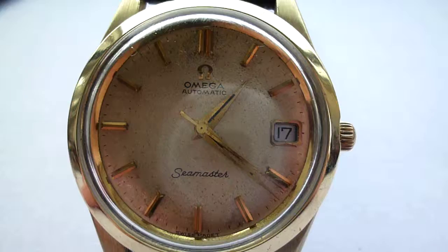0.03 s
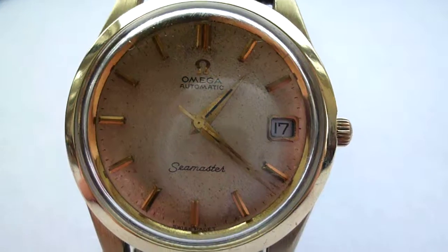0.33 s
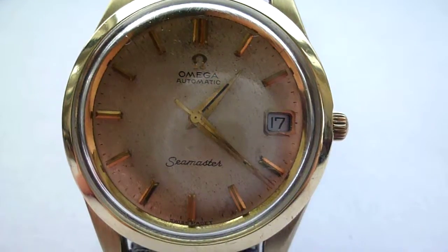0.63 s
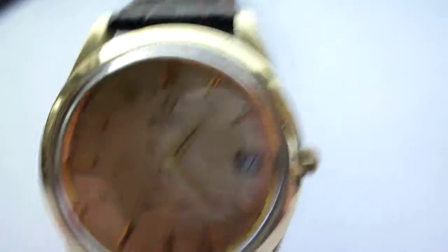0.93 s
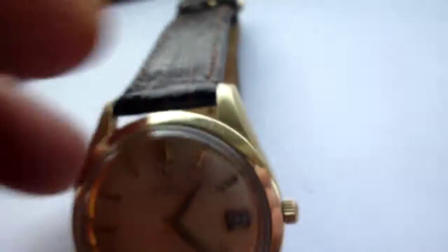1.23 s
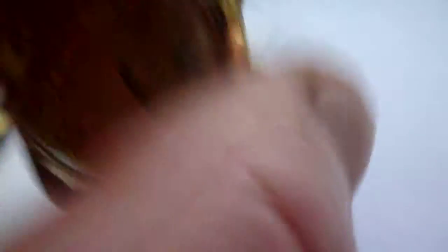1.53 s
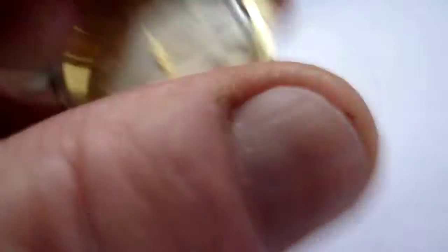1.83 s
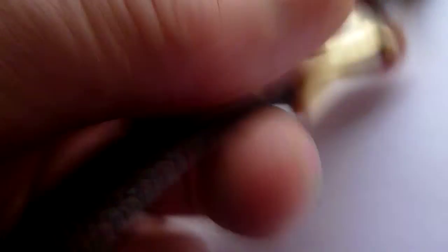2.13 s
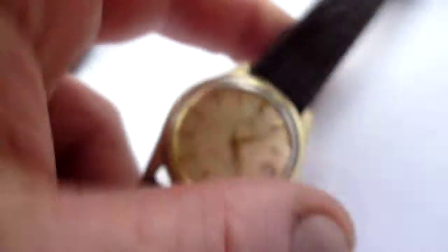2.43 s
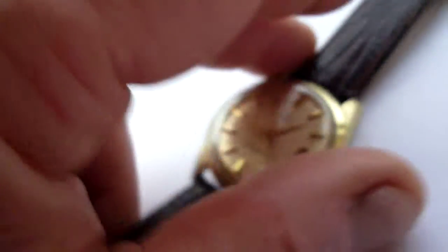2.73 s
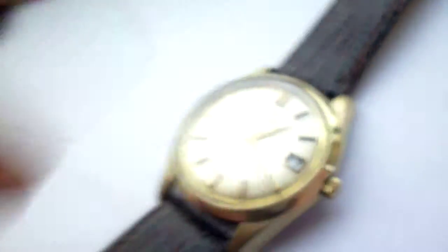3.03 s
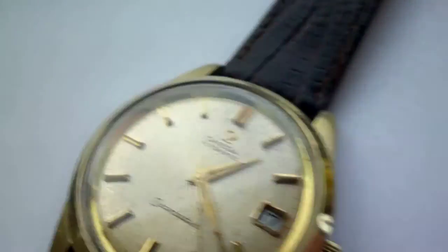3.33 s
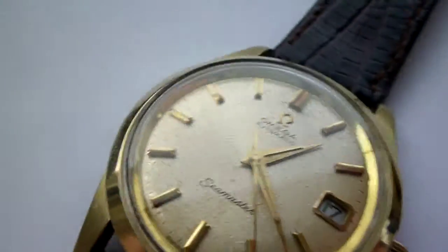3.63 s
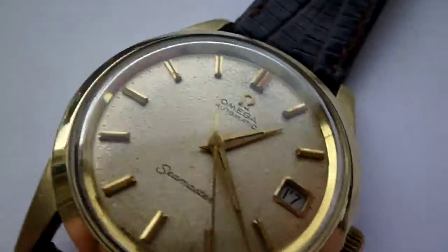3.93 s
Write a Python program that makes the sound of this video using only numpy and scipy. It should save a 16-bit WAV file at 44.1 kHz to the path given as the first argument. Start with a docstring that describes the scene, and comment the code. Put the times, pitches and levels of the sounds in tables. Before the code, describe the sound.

A wristwatch is handled close to the microphone in a quiet, faintly hissing room. After a few soft microphone bumps come leather rubs and sharp little metal clicks, then a light knock on a table with brief buckle chatter.

```python
"""A wristwatch is laid on a table: its case knocks on the top, which rings, and its buckle chatters.
Before that it is picked up and turned: the leather strap scuffs and creaks as it sticks and slips,
and the metal clicks in the fingers. Now and then fingers bump a hand-held camera close by.
A quiet room and the microphone's hiss lie under it all."""
import sys
import numpy as np
from scipy import signal
from scipy.fft import rfft, irfft
from scipy.io import wavfile
from scipy.ndimage import uniform_filter1d

SR = 44100
rng = np.random.default_rng(int(sys.argv[2]) if len(sys.argv) > 2 else 0)


def dump(signal):
    """Clip the signal to [-1, 1] and save it as 16-bit WAV at the path in sys.argv[1]."""
    limited = np.clip(np.atleast_2d(signal).T, -1, 1)
    pcm = np.round(limited * 32767).astype(np.int16)
    wavfile.write(sys.argv[1], SR, pcm)


N = 176400
TIME = np.arange(N) / SR


def gain(db):
    """Turn decibels into a number to multiply by."""
    return 10 ** (np.asarray(db) / 20)


def normalize(x):
    """Scale a sound to an average strength (rms) of 1."""
    return x / np.sqrt(np.mean(x ** 2))


def noise(colour, tilt_db=0):
    """Noise of strength 1, shaped by (frequency [Hz], level [dB]) points and tilted by dB per octave."""
    hz, db = np.array(colour).T
    octave = np.log2(np.fft.rfftfreq(N, 1 / SR) + 1)
    shape_db = np.interp(octave, np.log2(hz), db)
    shape_db += tilt_db * np.clip(octave, np.log2(hz[0]), np.log2(hz[-1]))
    return normalize(irfft(rfft(rng.standard_normal(N)) * gain(shape_db), N))


def fade(fade_s):
    """Die away by 60 dB in the given fade time."""
    return np.exp(-np.log(1000) * np.minimum(TIME / fade_s, 10))


def ring(tones):
    """A struck object rings with several tones, each fading at its own rate."""
    return sum(gain(db) * fade(fade_s) * np.sin(2 * np.pi * hz * TIME) for hz, db, fade_s in tones)


def arch(length_s):
    """A smooth rise and fall."""
    return np.sin(np.pi * np.minimum(np.arange(int(length_s * SR) + 2) / (length_s * SR), 1))


def add(out, start_s, sound):
    """Mix a sound in at a given time."""
    i = max(int(start_s * SR), 0)
    out[i:i + len(sound)] += sound[:N - i]


# the room's murmur and the microphone's hiss (frequency [Hz], relative level [dB])
BACKGROUND_COLOUR = [(15, -33.5), (25, -13), (30, -15.5), (33, -16), (129, -6), (190, -3.5), (219, -5),
                     (266, -5.5), (300, -5.5), (392, -8), (605, -12), (733, -13), (980, -15.5),
                     (1050, -15.5), (3280, -24.5), (6760, -29.5), (8000, -30.5), (10400, -57),
                     (17600, -120)]
# faint steady tones (pitch [Hz], level [dB])
STEADY_TONES = [(194, -70), (4387, -86.5), (6665, -87)]
def background(level_db=-53, waver_db=0.27):
    """Air murmurs and the microphone hisses, barely wavering, with faint steady tones."""
    drift = uniform_filter1d(rng.standard_normal(N), size=3000)
    waver = normalize(uniform_filter1d(drift, size=3000))
    tones = sum(gain(db) * np.sqrt(2) * np.sin(2 * np.pi * (hz * TIME + rng.random()))
                for hz, db in STEADY_TONES)
    return noise(BACKGROUND_COLOUR) * gain(level_db + waver_db * waver) + tones


# sound coming back from the walls (frequency [Hz], relative level [dB])
ECHO_COLOUR = [(100, -0.5), (400, -2.5), (1200, -7.5), (3000, -12.5), (8000, -6)]
def with_room_echo(sound, echo_db=-13.5, fade_s=0.23, delay_s=0.0056):
    """The walls add a short, dull tail to a sound."""
    tail = noise(ECHO_COLOUR) * fade(fade_s) * (TIME > delay_s)
    tail /= np.sqrt(np.sum(tail ** 2))
    return sound + gain(echo_db) * signal.fftconvolve(sound, tail)[:N]


# fingers bump the camera (time [s], level [dB], pitch [Hz], length [cycles])
FINGER_BUMPS = [(0.121, -40.5, 125, 1.5), (0.3226, -31.5, 150, 1.05), (0.3375, -34.5, 172, 1.5),
                (0.4896, -39.5, 238, 2.7), (1.0433, -37, 216, 3.6), (1.101, -44, 190, 3.5),
                (1.149, -46.5, 362, 6.4), (3.058, -47.5, 278, 5.66), (3.712, -47.5, 447, 7.73)]
def camera_bumps():
    """Each soft push rocks the camera back and forth once or a few times."""
    out = np.zeros(N)
    for start, db, hz, cycles in FINGER_BUMPS:
        swell = arch(cycles / hz) ** 2
        rocking = np.cos(2 * np.pi * (hz * TIME[:len(swell)] - cycles / 2))
        add(out, start, gain(db) * swell * rocking)
    return out


# how loudly the strap slides (time [s], level [dB])
SLIDE_LEVELS = [(.95, -75), (1.13, -71), (1.37, -66.5), (1.65, -69.5), (1.95, -70.5), (2.3, -74)]
# the hiss of sliding leather (frequency [Hz], relative level [dB])
LEATHER_COLOUR = [(500, -19), (2400, 2), (2800, 6), (3150, -9), (6800, -6.5), (8500, -11)]
def strap_slide():
    """The strap slides faintly through the fingers while the watch is turned."""
    times, db = np.array(SLIDE_LEVELS).T
    sliding = (TIME > times[0]) & (TIME < times[-1])
    return noise(LEATHER_COLOUR) * gain(np.interp(TIME, times, db)) * sliding


# strap rubs on skin (time [s], length [s], level [dB], pitch [Hz], filter width [share of pitch])
STRAP_RUBS = [(0.321, 0.0033, -48, 1300, 0.42), (0.3234, 0.0036, -39.5, 476, 0.58),
              (0.3385, 0.0028, -41.5, 616, 1.0), (0.35, .03, -62, 1490, .5),
              (0.417, 0.019, -59.5, 1530, 0.33), (0.4926, 0.0076, -49, 895, 0.11),
              (.493, 0.017, -54.5, 1570, 0.17), (1.07, 0.027, -65, 2680, 0.09),
              (1.104, .012, -57.5, 2190, 1.3), (1.32, 0.1, -67.5, 2870, .1), (1.147, .028, -49.5, 640, 1.2),
              (1.146, 0.013, -57.5, 2870, 1.1), (1.938, .07, -65.5, 3550, .15),
              (2.0698, 0.0047, -47.5, 2950, 0.34), (2.075, 0.015, -49, 2320, 0.42),
              (2.07, .02, -52, 950, 0.44), (2.078, 0.0067, -56.5, 4820, 0.24),
              (2.113, 0.01, -56, 2130, 0.38)]
def strap_scuffs(slips_per_s=3300, spread_db=4.5):
    """Leather sticks and slips in tiny, uneven jerks; each short run of them rings around one pitch."""
    out = np.zeros(N)
    slips = (rng.random(N) < slips_per_s / SR) * rng.choice([-1, 1], N)
    friction = slips * gain(spread_db * rng.standard_normal(N))
    for start, length, db, hz, width in STRAP_RUBS:
        swell = arch(length)
        band = signal.iirpeak(hz, 1 / width, fs=SR)
        rub = signal.lfilter(*band, signal.lfilter(*band, friction))[int(start * SR):]
        scuff = normalize(swell * rub[:len(swell)]) * np.sqrt(np.mean(swell ** 2))
        add(out, start, gain(db) * scuff)
    return out


# the metal clicks in the fingers (time [s], level [dB], brightness [dB per octave])
METAL_CLICKS = [(1.6978, -28.5, 2.5), (1.7008, -45, 4), (2.0701, -34, -4), (2.0742, -42, -8),
                (2.1114, -39, -3)]
# the crack that starts a click (frequency [Hz], relative level [dB])
CRACK_COLOUR = [(200, -8), (750, 19), (1450, 6), (2200, -7.5), (3100, 6.5), (4200, -4.5), (5200, -1),
                (6600, -1), (8500, -8.5)]
# tones of the watch case while held (pitch [Hz], relative level [dB], fade time [s])
CASE_TONES = [(730, -9.5, 0.014), (946, -19, .025), (1430, -19.5, 0.03), (2830, -28, 0.005),
              (3200, -38, .012), (6800, -23, .008)]
def metal_clicks():
    """The metal gives sharp cracks, and the fingers quickly stop its ringing."""
    out, case = np.zeros(N), ring(CASE_TONES)
    for start, db, bright_db in METAL_CLICKS:
        crack = noise(CRACK_COLOUR + [(11000, -34)], bright_db) * fade(fade_s=0.009)
        add(out, start, gain(db) * (crack / 2 + case))
    return out


# the buckle bounces (time [s], level [dB])
BUCKLE_BOUNCES = [(2.4687, -52), (2.4745, -42), (2.4814, -48), (2.4855, -44.5), (2.4896, -45.5),
                  (2.4950, -51), (2.499, -48), (2.5105, -55)]
# tones of the buckle (pitch [Hz], relative level [dB], fade time [s])
BUCKLE_TONES = [(5650, -16, 0.0079), (6250, -15, 0.012), (6830, -11, 0.037), (6880, -8, 0.055),
                (7050, -13.5, .015)]
def buckle_chatter(tick_db=-4, pitch_spread=0.0035):
    """The loose buckle bounces: each time a tick and a thin ring at a slightly different pitch."""
    out = np.zeros(N)
    tick_colour = [(1000, -18), (3000, -1), (6000, 8), (7200, -8), (8200, -15), (11000, -40)]
    for start, db in BUCKLE_BOUNCES:
        pitch_factor = 1 + pitch_spread * rng.standard_normal()
        metal = ring(np.array(BUCKLE_TONES) * [pitch_factor, 1, 1])
        tick = noise(tick_colour) * fade(fade_s=0.011)
        add(out, start, gain(db) * (metal + gain(tick_db) * tick))
    return out


# the watch case hits the table (time [s], level [dB], contact time [ms])
CASE_HITS = [(2.4708, -30, 0.21), (2.4750, -52.5, 0.22), (2.4802, -39.5, 0.24), (2.4889, -46, 0.47),
             (2.5490, -51.5, 1), (2.5595, -44.5, 0.58)]
# tones of the table top (pitch [Hz], relative level [dB], fade time [s])
TABLE_TONES = [(130, -31, .15), (197.6, -9, 0.2), (278, -13, .22), (325, -8.5, .22), (444, -16, 0.19),
               (502, 8, 0.046), (560, -5, 0.14), (712, 7.5, 0.041), (770, -12, 0.089), (947, -11, 0.092),
               (1074, -17, 0.12), (1405, -7, 0.053), (1550, -19, 0.027)]
# the table's thud, a short blur of many tones (frequency [Hz], relative level [dB])
THUD_COLOUR = [(25, -14), (100, 0.5), (200, 9), (550, -2), (1400, 1), (2200, -20), (8000, -27)]
def table_knocks(thud_db=7.5, low_hz=171, high_hz=1620):
    """Each hit of the case pushes the table top and makes it ring; a longer push sounds duller."""
    out, table_ring = np.zeros(N), ring(TABLE_TONES)
    for start, db, contact_ms in CASE_HITS:
        push = arch(contact_ms / 1000)
        thud = gain(thud_db) * noise(THUD_COLOUR) * fade(fade_s=0.027)
        knock = signal.fftconvolve(table_ring + thud, push / (2 * push.sum()))
        add(out, start, gain(db) * knock)
    # the board gives off little bass or treble
    out = signal.sosfilt(signal.butter(2, low_hz, "highpass", fs=SR, output="sos"), out)
    return signal.sosfilt(signal.butter(6, high_hz, fs=SR, output="sos"), out)


def scene():
    """The watch sounds with the room's echo; the camera bumps and the background have none."""
    watch = table_knocks() + buckle_chatter() + metal_clicks() + strap_scuffs() + strap_slide()
    return (with_room_echo(watch) + camera_bumps() + background())[None]


def record(dry):
    """The sound starts abruptly with a click after a brief silence; its high treble is cut."""
    start_s, offset = 0.036, 0.0137  # the jump from zero to the offset makes the click
    soften_hz, cutoff_hz = 7255, 8750
    abrupt = (dry + offset) * (TIME > start_s)
    softened = signal.sosfilt(signal.butter(8, soften_hz, fs=SR, output="sos"), abrupt)
    return signal.sosfilt(signal.ellip(8, .2, 70, cutoff_hz, fs=SR, output="sos"), softened)


dry = scene()
out = record(dry)
dump(out)
```